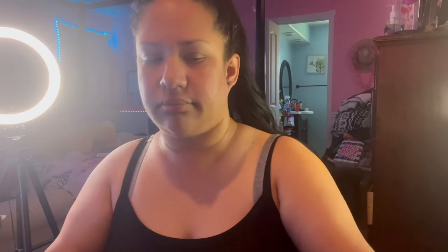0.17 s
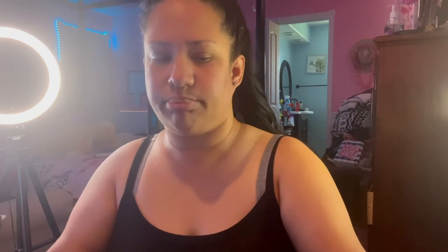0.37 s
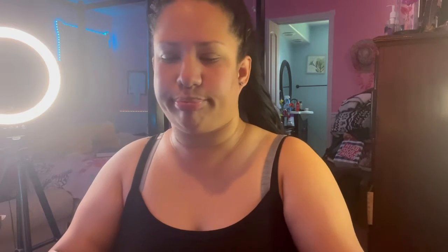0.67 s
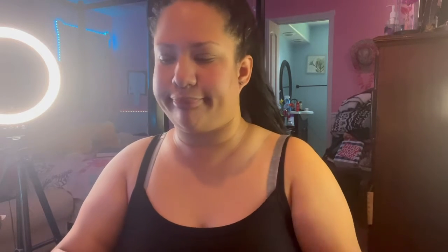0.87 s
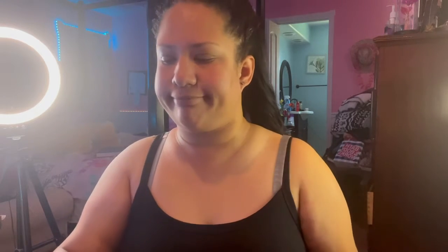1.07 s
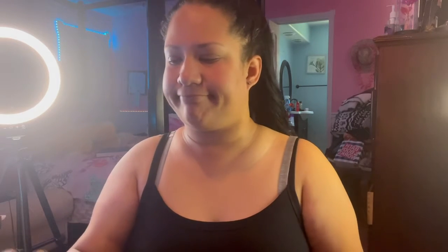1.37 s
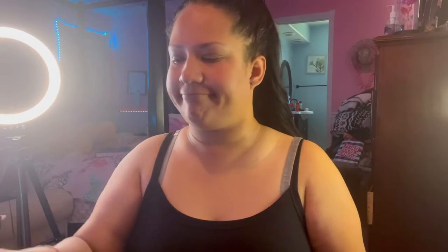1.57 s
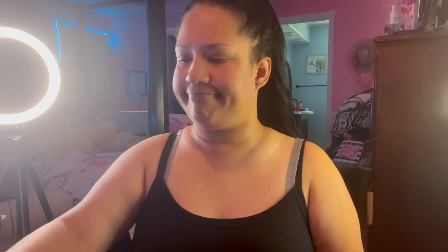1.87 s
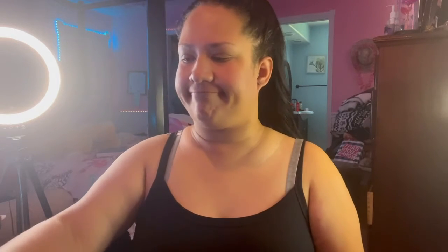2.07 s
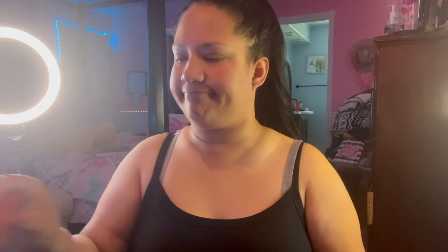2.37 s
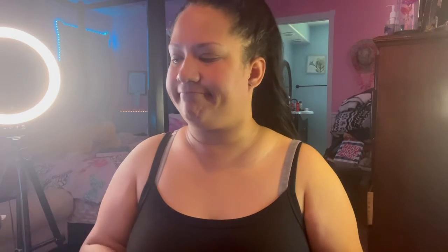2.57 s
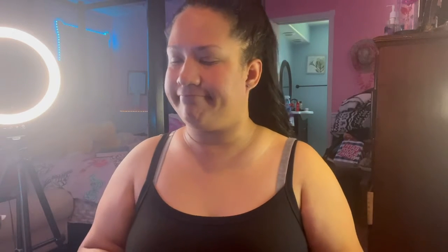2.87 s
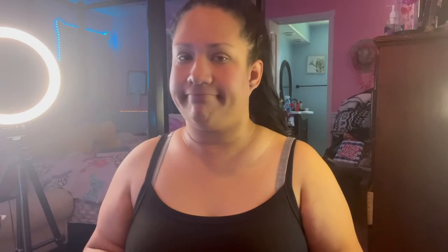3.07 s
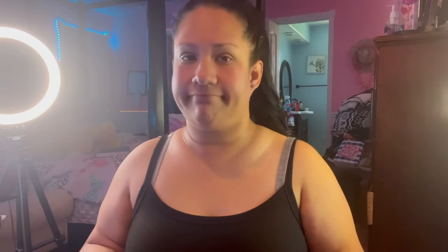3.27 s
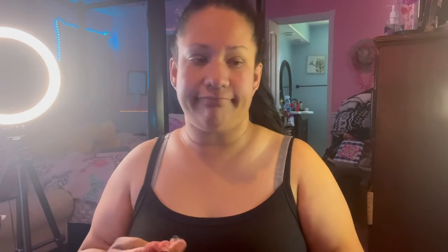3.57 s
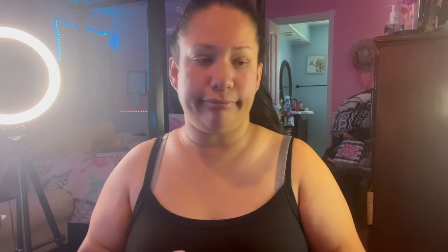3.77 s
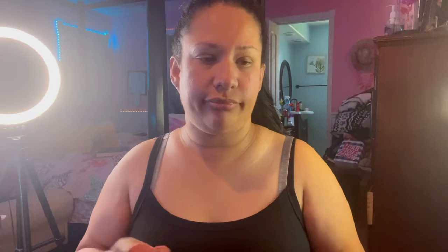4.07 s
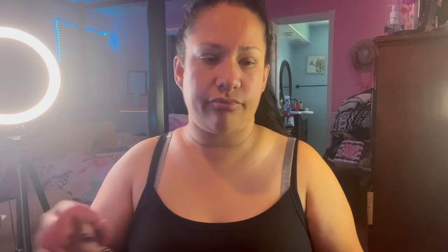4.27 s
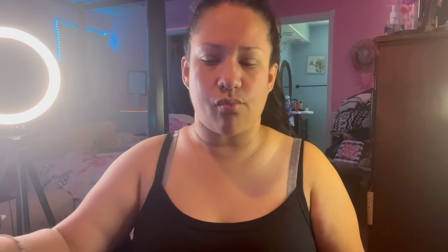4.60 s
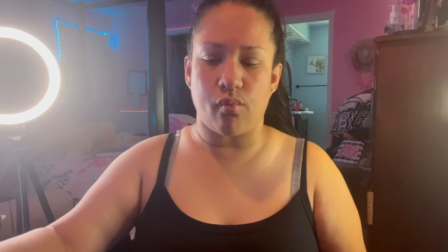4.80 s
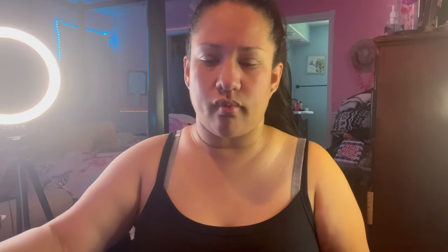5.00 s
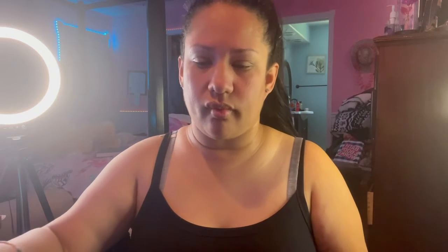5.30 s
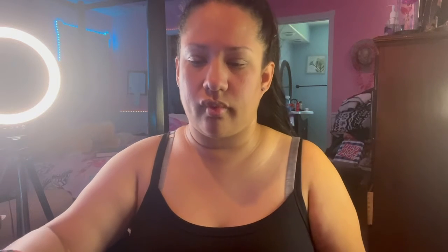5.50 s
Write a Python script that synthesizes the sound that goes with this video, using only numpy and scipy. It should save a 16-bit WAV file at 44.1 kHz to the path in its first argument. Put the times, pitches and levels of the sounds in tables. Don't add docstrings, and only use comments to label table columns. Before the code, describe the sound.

Small plastic items and crinkly film are grabbed, snapped and set down on a desk in bursts, over a faint low fan hum.

```python
import sys
import numpy as np
from scipy import signal
from scipy.fft import rfft, irfft, next_fast_len
from scipy.io import wavfile
from scipy.ndimage import uniform_filter1d

SR = 44100
rng = np.random.default_rng(int(sys.argv[2]) if len(sys.argv) > 2 else 0)


def volts(x):
    e = np.asarray(x, float) / 20
    return 10 ** e


def to_wav(sig):
    pcm = np.clip(np.atleast_2d(sig), -1, 1) * 32767
    pcm = np.round(pcm).astype(np.int16)
    wavfile.write(sys.argv[1], SR, pcm.T)


N = 248792
SIZE = next_fast_len(N + SR // 4)
HZ = np.maximum(np.arange(SIZE // 2 + 1) * SR / SIZE, 1)

# t/s, speed/(turns per s)
FAN_SPEED = [(0, 25.61), (.9, 25.68), (1.5, 25.59), (2.2, 25.7), (2.6, 25.62), (2.9, 25.66), (3.07, 25.3),
             (3.25, 25.62), (4.0, 25.82), (4.9, 25.74), (5.25, 25.55), (5.65, 25.6)]
# multiple/1, left level/dB, right level/dB, left lead/rad
FAN_ORDERS = [(1, -79.5, -77.5, 0.0), (2, -56, -58.5, -0.3), (3, -75, -68.5, -0.56), (4, -81, -86, 0.84),
              (5, -60, -57, -0.12), (6, -62.5, -51.5, -0.22), (7, -68, -62.5, 0.29), (8, -61, -74, 0.54),
              (9, -76, -62, 0.19), (10, -72.5, -69.5, -0.61), (11, -83.5, -87, -2.7),
              (12, -73, -73.5, 0.11), (13, -73.5, -71, -1.4)]
# f/Hz, width/Hz, level/dB
ROOM_BOOMS = [(49, 4, -72), (58.2, 3.6, -60), (71, 5.3, -70.5), (100.97, 1, -66.5)]
# f/Hz, level/(dB per Hz)
RUMBLE_SPECTRUM = [(30, -31), (38, -14.5), (60, 0.5), (100, -1.5), (160, -6.5), (250, -13), (335, -10.5),
                   (360, -24.5), (600, -41.5)]
# f/Hz, level/(dB per Hz)
HISS_SPECTRUM = [(250, -39), (400, 10.5), (900, 7.5), (2500, 3), (5000, -4.5), (8000, -2), (12000, -9),
                 (15000, 0.5), (16000, -6)]

# start t/s, length/s, level/dB, desk weight/dB, fineness/dB
RUBS = [(0.0, 0.034, -59.5, -1, 4), (0.142, 0.075, -49, 0.5, -2.5), (0.304, 0.025, -51, 8, -6),
        (0.651, 0.049, -52, 2, -1), (0.783, 0.33, -64.5, 2.5, -18), (1.273, .015, -62.5, 8, -16),
        (1.301, 0.01, -48, -2.5, -8), (1.347, 0.028, -61, 1, 1), (1.894, 0.096, -69.5, -2.5, -6),
        (2.02, 0.21, -80.5, 13, 0), (2.128, 0.094, -58.5, 0.5, 4), (2.188, 0.13, -65, -1.5, 6),
        (2.311, 0.017, -60.5, -4.5, 4), (2.487, 0.057, -72.5, -12, 5), (2.997, 0.2, -79.5, -5, 5),
        (3.384, 0.088, -82, -7, -31), (4.112, 0.23, -89.5, -1.5, 7.5), (4.331, 0.22, -72.5, -20, 5),
        (4.647, 0.034, -59.5, 3, 3), (4.755, 0.052, -73, -2, 7.5), (5.068, 0.014, -81.5, 8, 10)]
# start t/s, length/s, level/dB, desk weight/dB, fineness/dB
GRIPS = [(0.055, 0.079, -50.5, 0, -1), (0.251, 0.05, -48, -19, -25), (0.472, 0.08, -59, 2, -1),
         (0.546, 0.019, -57, 6.5, -15), (0.384, 0.004, -43.5, -2.5, -10.5), (1.73, 0.0077, -73, -5, -25),
         (4.582, 0.052, -59, 1.5, 4), (5.249, 0.019, -54, -3.5, -0.5), (5.456, .02, -61, -15, 8),
         (5.474, 0.03, -43, 7, -12), (5.491, 0.036, -38.5, -5, -2.5)]
# t/s, level/dB, t60/s, desk weight/dB, fineness/dB
SETTLES = [(0.418, -47, 0.19, -5, -15), (.587, -52, 0.28, 6.5, 0), (1.099, -49.5, 0.4, -3.5, -10),
           (1.503, -65.5, 0.088, -7, -8), (1.815, -54, 0.24, 11.5, -19), (2.538, -55.5, 0.26, -8, -20),
           (2.6, -78, 1, -14, 3), (2.829, -70, 0.36, -6, -4), (3.54, -84, 1, -10, -22),
           (3.707, -75, 0.31, -10, 5), (3.869, -82.5, 0.93, -4, 8), (4.812, -57, 0.21, 4, 1),
           (5.55, -57, 0.29, -17, -17), (5.579, -49.5, 0.39, 4, -10)]
# f/Hz, level/(dB per Hz)
SCUFF_SPECTRUM = [(120, -10.5), (250, 2.5), (400, -3), (750, 4.5), (1100, 2), (1600, -0.5)]
# f/Hz, level/(dB per Hz)
SCRAPE_SPECTRUM = [(800, -13.5), (1200, 0), (1800, -5), (2500, -1.5), (3200, -7)]
# f/Hz, level/(dB per Hz)
CRINKLE_SPECTRUM = [(2000, -18.5), (2800, -0.5), (3800, 3), (4800, 3.5), (6800, 1.5), (8300, -3),
                    (9400, -1.5)]
# f/Hz, level/(dB per Hz)
SIZZLE_SPECTRUM = [(7500, -37), (9000, 6), (11500, -0.5), (14000, 3.5), (15600, 0.5), (16400, -43)]
# f/Hz, width/Hz, level/dB
DESK_MODES = [(321, 42, 5.5), (362.6, 36, 7), (412.5, 25, 5.5), (524, 36, 3), (616, 18.5, 1.5),
              (718.7, 13, -0.5), (825, 32, -3), (937, 33, -4.5), (1336, 16, -19.5), (1620, 200, -23),
              (1940, 40, -8), (2770, 95, -8.5), (2920, 25, -18), (6800, 1350, -4.5), (7690, 560, -0.5)]

# t/s, peak level/dB, ring f/Hz, relative top level/dB
CASE_SNAPS = [(0.058, -31.5, 3340, -10), (.507, -44, 4700, -10), (0.5503, -39, 2300, -10),
              (.587, -44, 2800, 2), (.908, -36, 3760, -25), (1.0244, -32, 3480, -11),
              (1.059, -47, 2800, -18), (1.103, -38.5, 2570, -6), (1.3023, -32, 2590, -7),
              (1.503, -54, 3440, 3), (1.815, -39, 4380, -8), (1.89, -51, 2900, -6), (1.9344, -53, 3210, -1),
              (2.137, -39, 2600, 13), (2.2997, -44, 2580, 12), (4.656, -39.5, 2530, -3),
              (4.8158, -42, 2770, -6), (4.879, -43.5, 2570, -10), (5.237, -49.5, 2740, -4),
              (5.484, -19, 2820, -6), (5.5856, -43, 2770, -8), (5.6354, -32.5, 2720, 0)]
# t/s, peak level/dB, ring f/Hz, relative top level/dB
FILM_SNAPS = [(0.2555, -31.5, 4670, 10), (0.3044, -30, 8100, -19), (.379, -34, 6800, -11),
              (.3855, -33, 6700, -10), (.418, -26.5, 6800, -17), (.463, -31.5, 7100, -8),
              (.5262, -39, 6100, -8), (0.7782, -33.5, 5600, -11), (.787, -43, 7500, -8),
              (0.8287, -34, 4900, 8.5), (0.9672, -36.5, 6800, -3), (1.068, -39, 4560, -11),
              (1.1924, -39, 4570, -16), (1.258, -39.5, 7130, -8), (1.279, -33.5, 7240, -5),
              (1.304, -34, 7000, -1), (1.4327, -49.5, 3260, -13), (1.7303, -56.5, 6800, -12),
              (2.037, -53, 6100, 8), (2.194, -43.5, 7060, -15), (2.219, -38, 7500, -1),
              (2.313, -56, 8800, -2), (2.3295, -39.5, 7900, 2), (2.5367, -31, 6800, -26),
              (2.83, -46, 6300, -6), (3.737, -63, 7150, -8), (4.5775, -46, 7850, -15),
              (4.588, -38.5, 5470, -22), (4.654, -51, 7500, -10), (5.0714, -61, 7050, 5),
              (5.255, -43, 8400, -7), (5.508, -30, 8200, 13)]
# t/s, peak level/dB, f/Hz, t60/s
THUMPS = [(0.137, -39, 312, 0.055), (0.296, -41, 62.4, 0.41), (0.302, -41, 280, 0.1),
          (0.587, -32.5, 100.6, 0.16), (0.681, -36, 153.3, 0.25), (1.092, -38.5, 160.2, 0.29),
          (1.301, -37, 62.4, 0.079), (1.813, -32.5, 132, 0.17), (5.47, -46, 306, 0.19),
          (5.508, -54, 333, 0.19), (5.58, -38, 160, 0.12), (1.112, -35, 46, 0.56)]
# t/s, peak level/dB, ring f/Hz, t60/s
HOLLOW_KNOCKS = [(0.14, -23, 768, 0.069), (0.301, -34, 574, 0.14), (0.384, -38.5, 815, 0.069),
                 (0.587, -30.5, 663, 0.053), (0.672, -35.5, 405, 0.069), (1.098, -36.5, 370, 0.13),
                 (1.103, -29.5, 764, 0.1), (1.301, -34.5, 687, 0.078), (1.814, -37.5, 550, 0.048),
                 (2.02, -56, 733, 0.082), (2.537, -40, 854, 0.043), (4.578, -47, 810, 0.094),
                 (4.812, -44, 880, 0.06), (5.472, -26.5, 580, 0.03), (5.486, -26.5, 643, 0.08),
                 (5.506, -27.5, 547, 0.12)]
# t/s, peak level/dB, ring f/Hz, t60/s
HARD_KNOCKS = [(0.5853, -37, 2736, .06), (0.648, -41, 2500, .04), (1.024, -40.5, 3430, 0.011),
               (1.097, -23, 2100, 0.04), (1.099, -36, 1400, .06), (1.102, -32, 2536, 0.071),
               (1.104, -33, 5760, .05), (1.108, -35, 1940, .05), (1.8131, -30, 4350, 0.0079),
               (1.8137, -34.5, 2070, .039), (3.7, -58, 1800, 0.039), (5.7, -57, 4050, .04),
               (5.2563, -53, 2900, .08), (5.4864, -27, 5620, .04), (5.5644, -36, 2743, .04)]
# t/s, peak level/dB, ring f/Hz
FINGER_TAPS = [(2.975, -59, 895), (3.277, -63, 2100), (3.294, -66, 1800), (3.346, -59, 2000),
               (3.365, -64, 1600), (3.4, -63, 1650), (3.421, -52, 1785), (3.478, -64, 1560),
               (3.533, -54, 3790), (3.534, -50.5, 1770), (3.539, -56, 3070), (3.54, -56, 4750),
               (3.658, -65, 1780), (3.742, -67, 2500)]
# start t/s, length/s, level/dB, f/Hz, width/Hz
DRAGS = [(.19, 0.025, -51, 6000, 3000), (.55, 0.037, -60, 2800, 250), (0.609, 0.046, -59.5, 3600, 200),
         (0.639, 0.053, -54.5, 2830, 200), (0.652, 0.033, -50.5, 1470, 250), (1.108, 0.044, -58, 804, 250),
         (1.11, 0.027, -61, 5770, 500), (1.112, .04, -53, 1920, 250), (1.301, 0.012, -48.5, 6450, 2500),
         (2.002, .1, -71, 750, 300), (2.115, 0.2, -65.5, 2560, 300), (2.151, 0.073, -51.5, 7000, 1500),
         (2.239, 0.11, -67, 6760, 2000), (3.356, 0.058, -84, 1600, 300), (3.433, 0.082, -77.5, 1620, 250),
         (3.436, 0.13, -81.5, 4000, 250), (3.533, 0.048, -79, 1750, 250), (3.538, 0.056, -82.5, 3800, 1500),
         (3.617, 0.037, -87, 2050, 150), (4.299, 0.21, -80.5, 1640, 598), (4.601, 0.078, -64, 7000, 2500),
         (4.654, .015, -64, 2600, 500), (5.566, 0.035, -54.5, 2800, 250)]
# f/Hz, right lead/rad, likeness/(0 to 1), left-right level/dB
PORTS = [(60.5, -0.5, 1.0, 0), (255, -.5, 0.87, 3), (700, -2, 0.51, 4.0), (1220, -3.0, 0.47, 3),
         (2200, -4.5, 0.2, 0), (3010, -4.5, 0.72, 1.5), (4110, -7.0, 0.04, 2.2), (5300, -5, 0.1, 4.3),
         (7600, -4.0, 0.3, -2.3), (8370, -5.0, 0.88, -4.3), (9300, -np.pi, 1, 0), (13000, -np.pi, 1, 0),
         (14300, -2.0, 0.3, 2), (15400, 10.5, 0.4, -3), (16100, 8, .8, 2)]


def rms_one(x):
    return x / np.sqrt(np.mean(x ** 2) + 1e-20)


def at_hz(points, column=1):
    table = np.array(points)
    return np.interp(np.log(HZ), np.log(table[:, 0]), table[:, column])


def colour(x, spectrum):
    below = [(spectrum[0][0] / 2, -70)]
    above = [(spectrum[-1][0] * 2.37, -70)]
    gain = rms_one(volts(at_hz(below + spectrum + above)))
    return irfft(rfft(x, SIZE) * gain, SIZE)[..., :N]


def drift(rate_hz):
    r = np.exp(-2 * np.pi * rate_hz / SR)
    wander = signal.lfilter([1], [1, -2 * r, r * r], rng.standard_normal(N + SR))
    return rms_one(wander[SR:])


def ring(x, hz, t60_s):
    r = volts(-60 / (t60_s * SR))
    w = 2 * np.pi * hz / SR
    return signal.lfilter([np.sin(w)], [1, -2 * r * np.cos(w), r * r], x)


def peak_one(x):
    return x / np.abs(x).max(axis=1, keepdims=True)


def fan(wobble_db=1.5):
    t_s, turns_per_s = np.transpose(FAN_SPEED)
    speed = np.interp(np.arange(N) / SR, t_s, turns_per_s)
    angle = 2 * np.pi * np.cumsum(speed) / SR
    out = np.zeros((2, N))
    for order, left_db, right_db, lead_rad in FAN_ORDERS:
        phase = order * angle + 2 * np.pi * rng.random()
        swell = np.sqrt(2) * volts(wobble_db * drift(1.7))
        left = volts(left_db) * np.sin(phase + lead_rad)
        right = volts(right_db) * np.sin(phase)
        out += swell * [left, right]
    return out


def room_air(rumble_db=-61.5, hiss_db=-79.5):
    white = rng.standard_normal((3, 3, N))
    booms = sum(volts(db) * rms_one(ring(white[0], hz, 1.8 / width_hz))
                for hz, width_hz, db in ROOM_BOOMS)
    rumble = volts(rumble_db) * colour(white[1], RUMBLE_SPECTRUM)
    hiss = volts(hiss_db + 0.61 * drift(4.4)) * colour(white[2], HISS_SPECTRUM)
    return booms + rumble + hiss


def strokes(scrape_db=-5, scrape_follows=0.76):
    rub_rise, grab_rise, set_down_rise, rub_fall = 268, 1491, 6000, 312
    rows = [(s, s + length, db, rub_rise, rub_fall, *mix) for s, length, db, *mix in RUBS]
    rows += [(s, s + length, db, grab_rise, rub_fall, *mix) for s, length, db, *mix in GRIPS]
    rows += [(s, s, db, set_down_rise, 60 / t60_s, *mix) for s, db, t60_s, *mix in SETTLES]
    t = np.arange(0, N, 8) / SR
    power = 0
    for start, end, db, rise, fall, weight_db, fine_db in rows:
        before_s = np.maximum(start - t, 0)
        after_s = np.maximum(t - end, 0)
        shape = volts(db - rise * before_s - fall * after_s)
        item_db = scrape_db + scrape_follows * weight_db
        shares = volts([[weight_db], [item_db], [0], [fine_db]])
        power = power + (shares * shape) ** 2
    return np.repeat(np.sqrt(power), 8, axis=1)[:, :N]


def handling(grain_db=4.5, clump_db=2.0, grains_per_s=2500, smooth=0.67, mode_db=5.5):
    sizes = volts(grain_db * np.minimum(rng.exponential(1, N), 5))
    grains = sizes * (rng.random(N) < grains_per_s / SR)
    cracks = rms_one(signal.lfilter([1], [1, -.9], grains))
    drive = rng.standard_normal((3, N)) * (smooth + cracks * (1 - smooth))
    lift = 1 + sum(volts(mode_db + db) / (1 + 2j * (HZ - hz) / width_hz)
                   for hz, width_hz, db in DESK_MODES)
    drive = irfft(rfft(drive, SIZE) * lift, SIZE)[:, :N]
    clumps = drift(20.3)
    spectra = (SCUFF_SPECTRUM, SCRAPE_SPECTRUM, CRINKLE_SPECTRUM, SIZZLE_SPECTRUM)
    out = 0
    for spectrum, pressure in zip(spectra, strokes()):
        gain = pressure * volts(clump_db * (clumps + 1.05 * drift(33.0)))
        out = out + gain * rms_one(colour(drive, spectrum))
    return out


def snaps(crack_s=0.00078, ring_t60_s=0.014, spray_t60_s=0.058, edge_hz=2600, top_hz=8500):
    out = np.zeros((2, 3, N + SR))
    t = np.arange(SR // 8) / SR
    bright = signal.butter(2, edge_hz, "high", fs=SR, output="sos")
    top = signal.butter(2, top_hz, "high", fs=SR, output="sos")
    rows = [(*row, -8, -11) for row in FILM_SNAPS]
    rows += [(*row, -7, -12.5) for row in CASE_SNAPS]
    for s, db, hz, top_db, ring_db, spray_db in rows:
        noise = rng.standard_normal((2, 3, len(t)))
        crack = 1.92 * peak_one(noise[0] * np.exp(-t / crack_s))
        spray = noise[1] * volts(spray_db - 60 * t / spray_t60_s) * np.minimum(t / 0.0086, 1)
        both = signal.sosfilt(bright, [crack, spray])
        both += (volts(top_db) - 1) * signal.sosfilt(top, both)
        both[0] += volts(ring_db) * peak_one(ring(crack, hz, ring_t60_s))
        first = round(s * SR)
        out[..., first:first + len(t)] += volts(db) * both
    return out[..., :N]


def thumps():
    out = np.zeros((3, N))
    for s, db, hz, t60_s in THUMPS:
        push = np.full((3, N), 1e-18)
        push[:, round(s * SR)] = volts(db - 7.5)
        out += ring(push, hz, t60_s)
        out += 0.46 * ring(push, hz * 1.8, t60_s * 0.53)
        out -= 0.5 * ring(push, hz * 0.53, t60_s * 2.5)
    return signal.lfilter([.08], [1, -.92], out)


def knocks(tap_t60_s=0.026):
    rows = [(*row, 0.0039) for row in HOLLOW_KNOCKS]
    rows += [(*row, 0.0048) for row in HARD_KNOCKS]
    rows += [(*row, tap_t60_s, 0.0085) for row in FINGER_TAPS]
    modes = ((1, 0.89, 1.09), (1.21, 0.43, 0.36), (0.78, 0.29, 0.034), (1.9, 0.78, 0.071))
    out = np.zeros((3, N + SR))
    t = np.arange(SR // 4) / SR
    for s, db, hz, t60_s, contact_s in rows:
        contact = rng.standard_normal((3, len(t))) * np.exp(-t / contact_s)
        body = sum(share * peak_one(ring(contact, hz * ratio, t60_s * hold))
                   for ratio, hold, share in modes)
        first = round(s * SR)
        out[:, first:first + len(t)] += volts(db - 6.0) * body * [[1], [.6], [.6]]
    return out[:, :N]


def drags(grit_db=3.0, edge_db_per_s=1100):
    out = np.zeros((3, N + SR))
    lead_in = SR // 16
    t = np.arange(-lead_in, SR // 3) / SR
    for s, length_s, db, hz, width_hz in DRAGS:
        catch = np.repeat(rng.standard_normal(len(t) // 128 + 1), 128)[:len(t)]
        t60_s = np.log(1000) / np.pi / width_hz
        tone = rms_one(ring(rng.standard_normal((3, len(t))), hz, t60_s))
        outside_s = np.maximum(-t, 0) + np.maximum(t - length_s, 0)
        shape = volts(db + grit_db * catch - edge_db_per_s * outside_s)
        first = round(s * SR) - lead_in
        out[:, first:first + len(t)] += tone * shape
    return out[:, :N]


def ports(sound, likeness=0.97):
    shared, left, right = rfft(sound, SIZE)
    lead_rad = uniform_filter1d(at_hz(PORTS), size=SIZE // 150)
    turn = np.exp(.5j * lead_rad * HZ / (HZ + 44.1))
    alike = np.clip(likeness * at_hz(PORTS, column=2), 0, 1)
    alike = alike ** (HZ / (HZ + 150))
    pair = np.sqrt(alike) * shared * [1 / turn, turn]
    pair = pair + np.sqrt(1 - alike) * np.array([left, right])
    lean = volts(at_hz(PORTS, column=3) / 2)
    return irfft(pair * [lean, 1 / lean], SIZE)[:, :N]


def scene():
    cracks, sprays = snaps()
    sounds = room_air() + handling() + sprays + thumps() + knocks() + drags()
    return fan() + ports(sounds) + ports(cracks, likeness=0.78)


def low_pass(x):
    return signal.sosfilt(signal.butter(12, 16650, fs=SR, output="sos"), x)


def record(dry):
    top_cut = signal.cheby1(10, .5, 15800, fs=SR, output="sos")
    bass_cut = signal.butter(2, 24, "high", fs=SR, output="sos")
    mix = signal.sosfilt(np.vstack([top_cut, bass_cut]), dry)
    return low_pass(mix)


dry = scene()
out = record(dry)
to_wav(out)
```